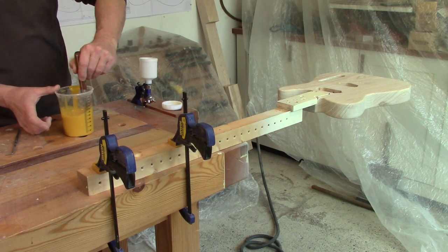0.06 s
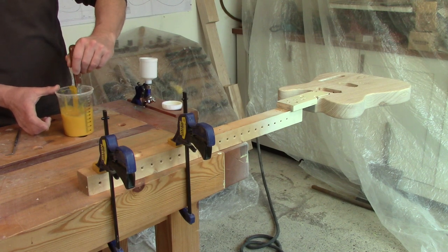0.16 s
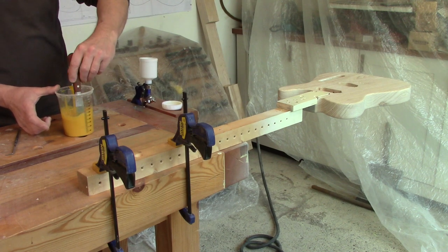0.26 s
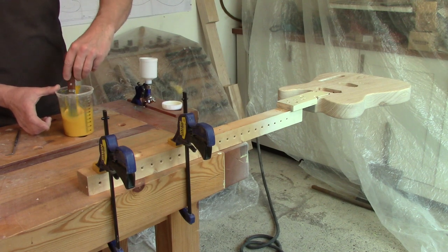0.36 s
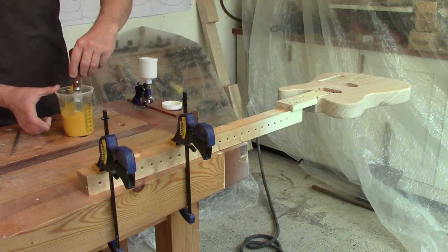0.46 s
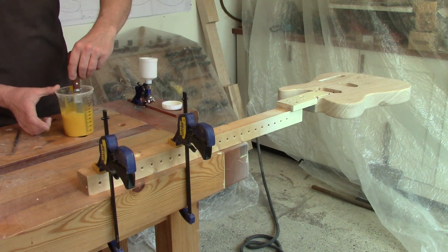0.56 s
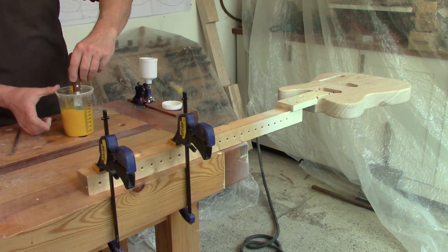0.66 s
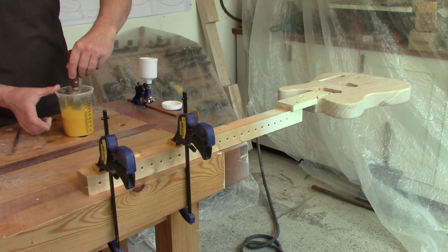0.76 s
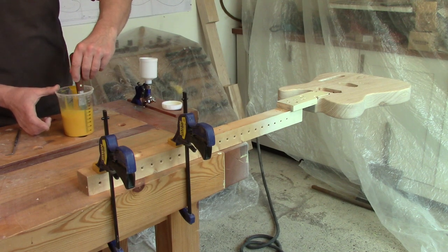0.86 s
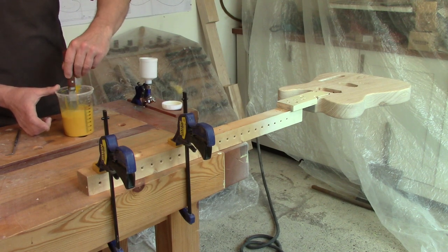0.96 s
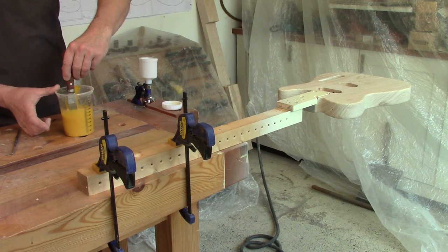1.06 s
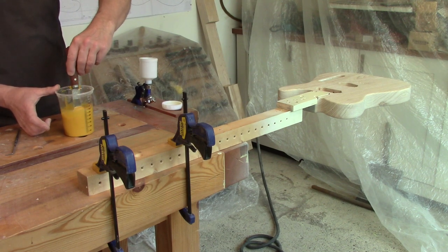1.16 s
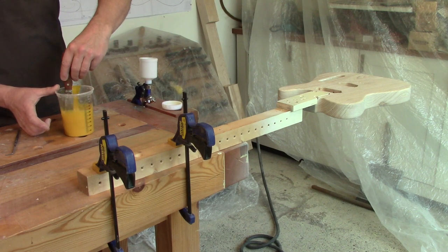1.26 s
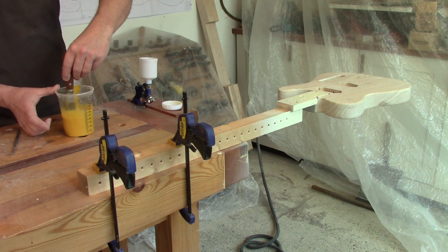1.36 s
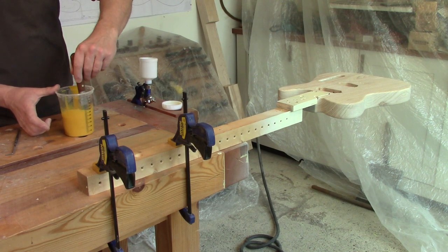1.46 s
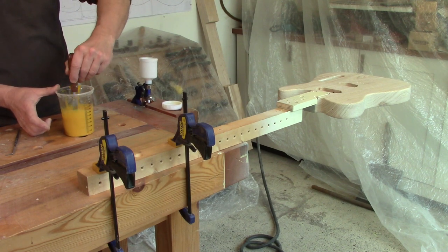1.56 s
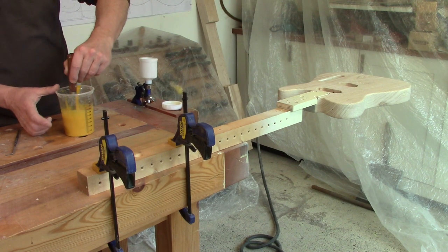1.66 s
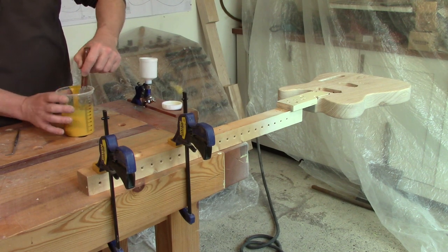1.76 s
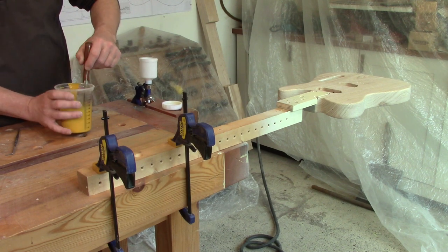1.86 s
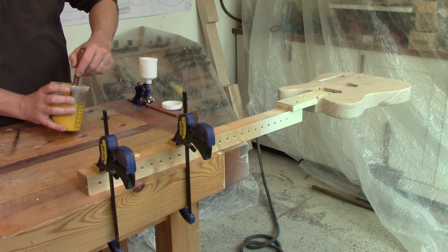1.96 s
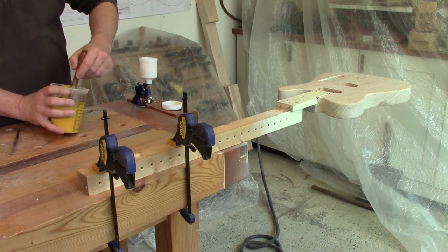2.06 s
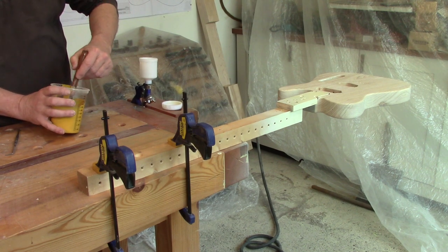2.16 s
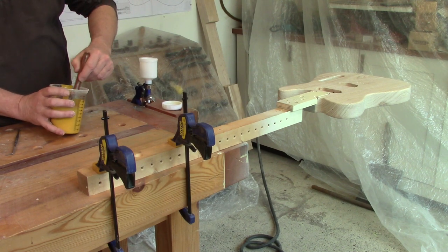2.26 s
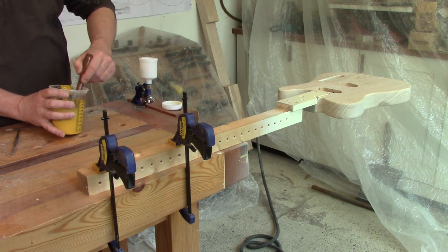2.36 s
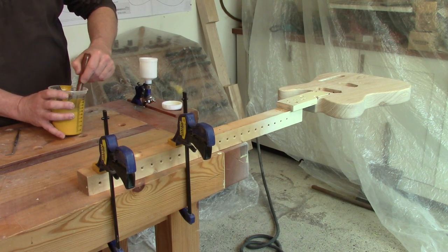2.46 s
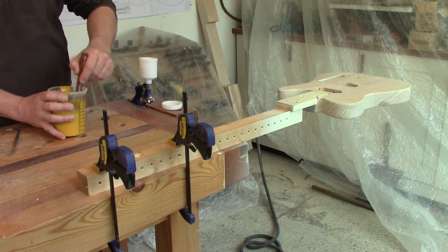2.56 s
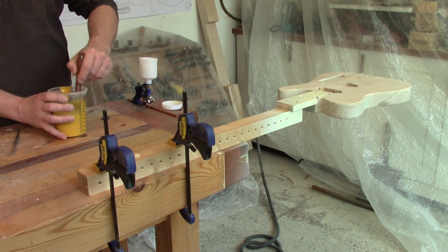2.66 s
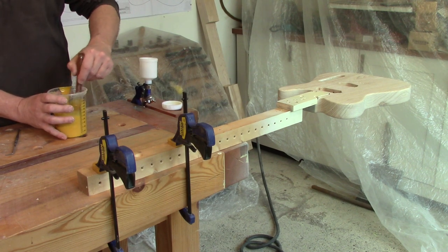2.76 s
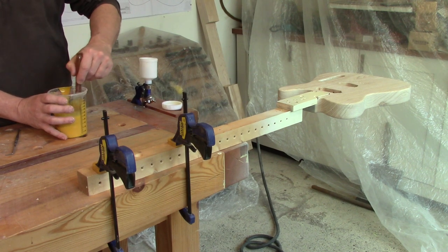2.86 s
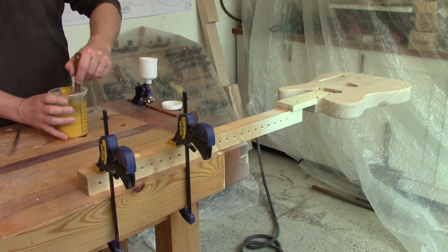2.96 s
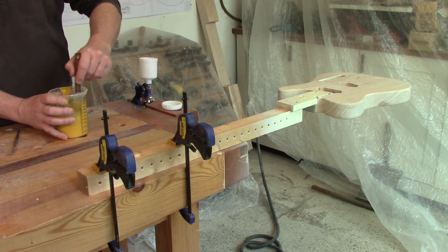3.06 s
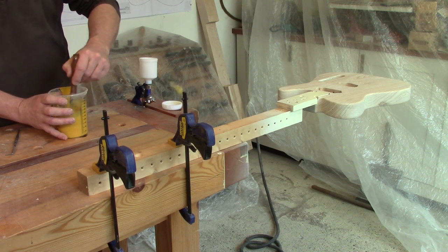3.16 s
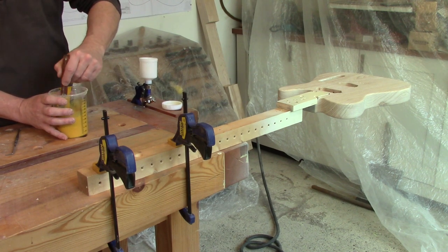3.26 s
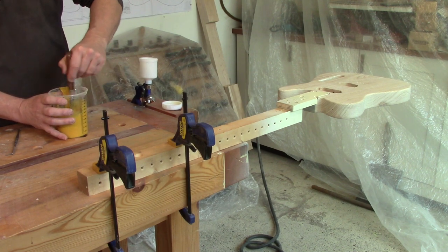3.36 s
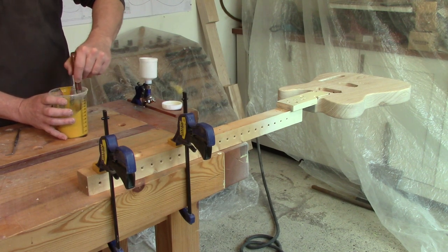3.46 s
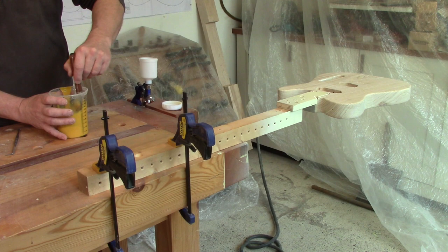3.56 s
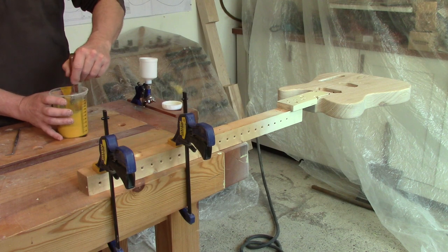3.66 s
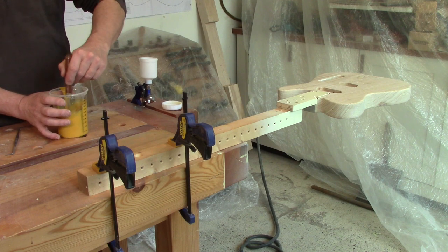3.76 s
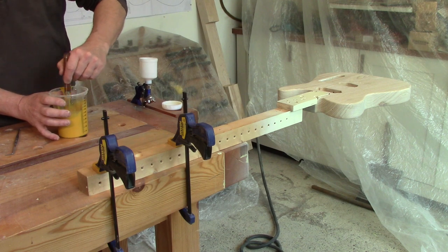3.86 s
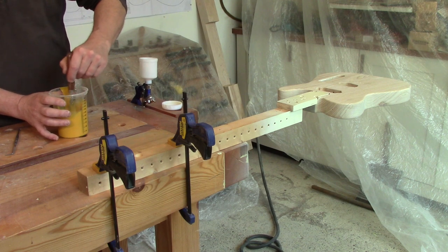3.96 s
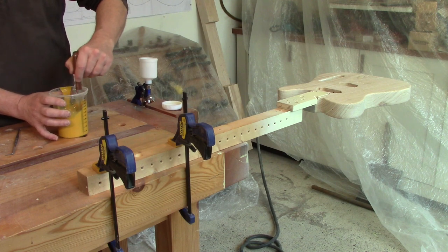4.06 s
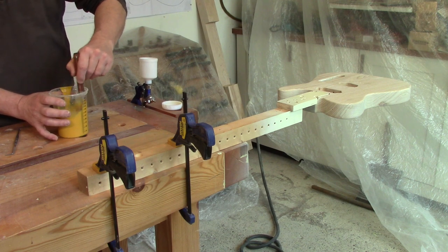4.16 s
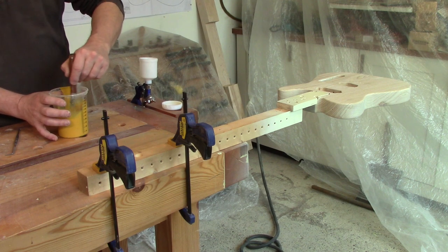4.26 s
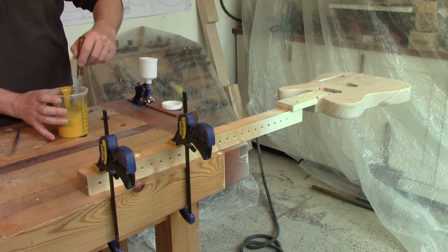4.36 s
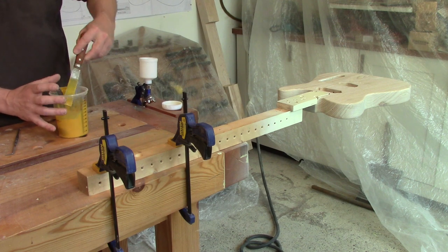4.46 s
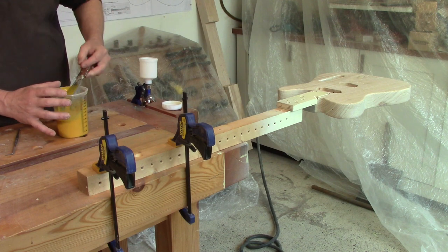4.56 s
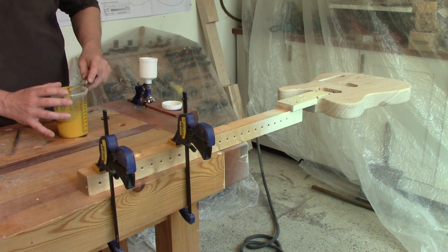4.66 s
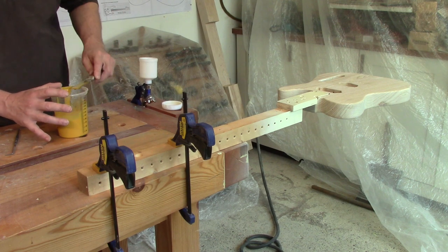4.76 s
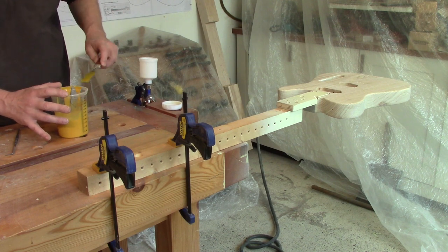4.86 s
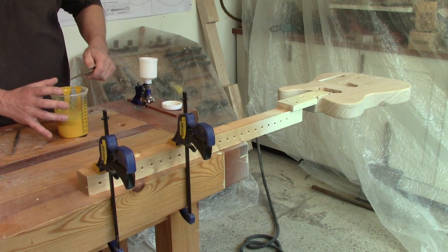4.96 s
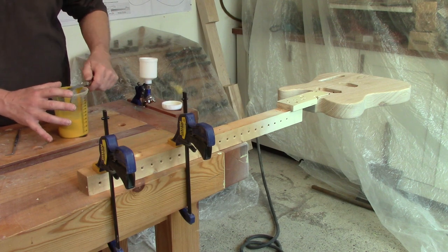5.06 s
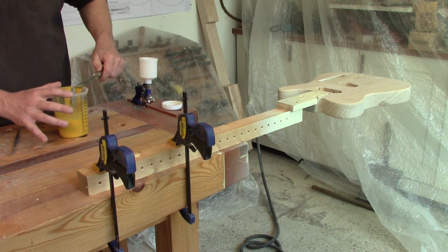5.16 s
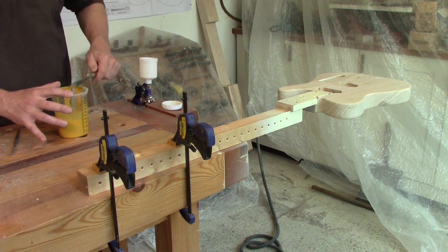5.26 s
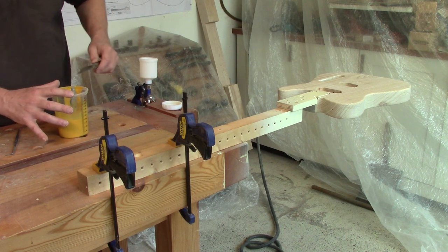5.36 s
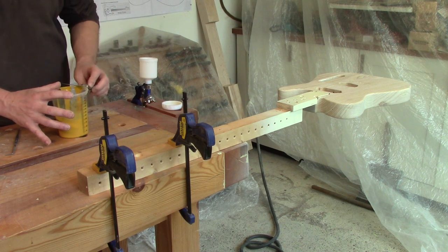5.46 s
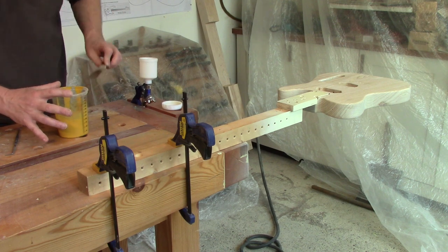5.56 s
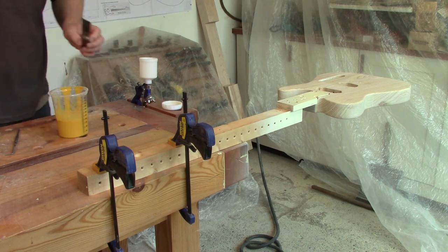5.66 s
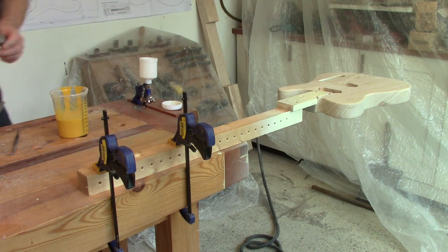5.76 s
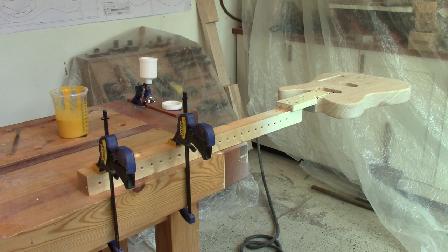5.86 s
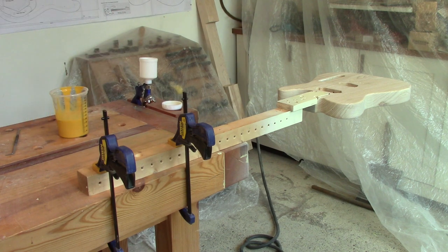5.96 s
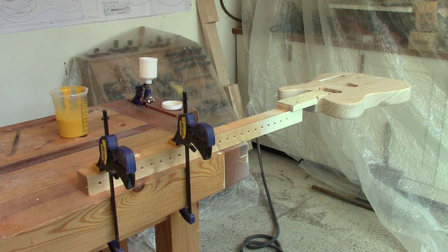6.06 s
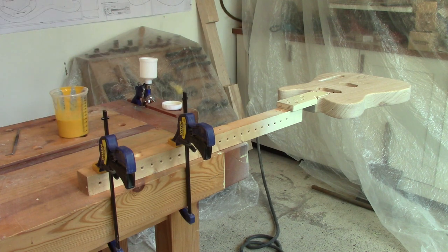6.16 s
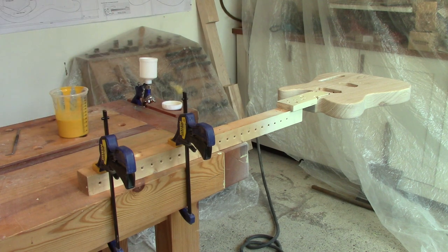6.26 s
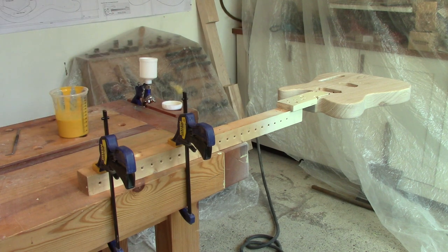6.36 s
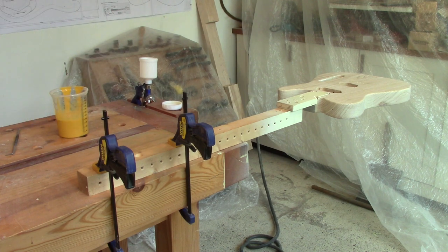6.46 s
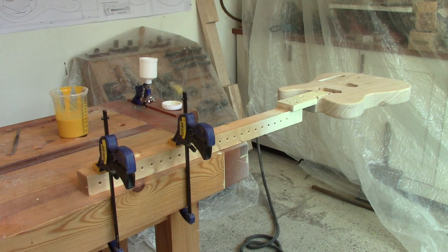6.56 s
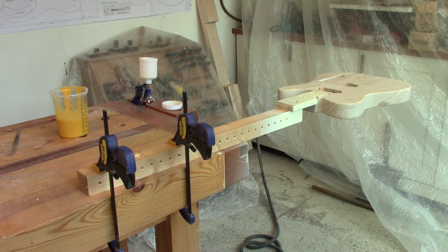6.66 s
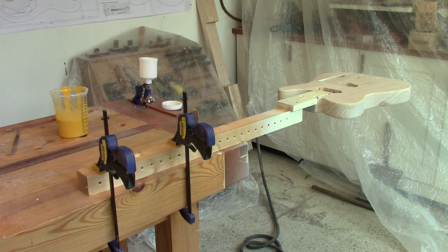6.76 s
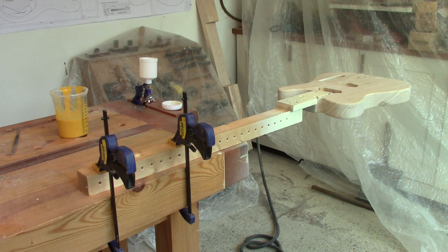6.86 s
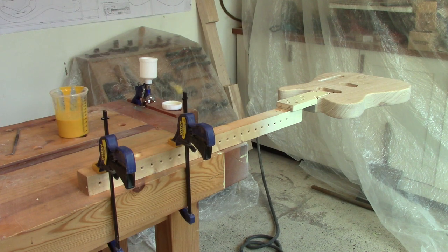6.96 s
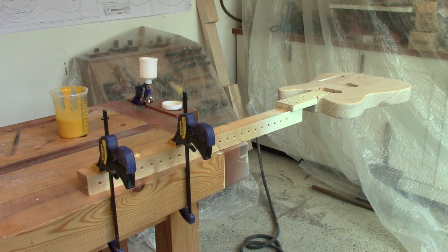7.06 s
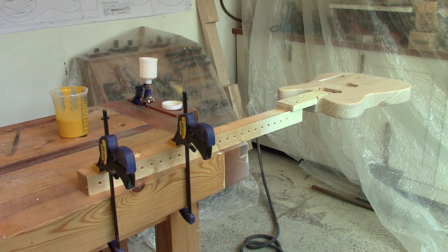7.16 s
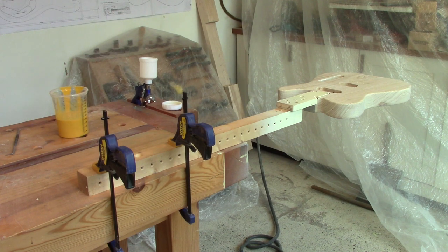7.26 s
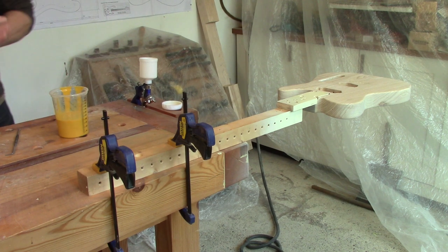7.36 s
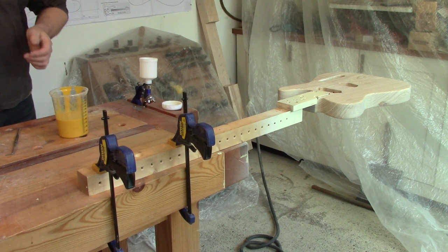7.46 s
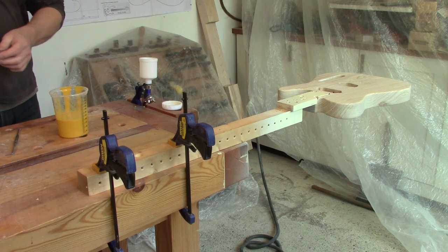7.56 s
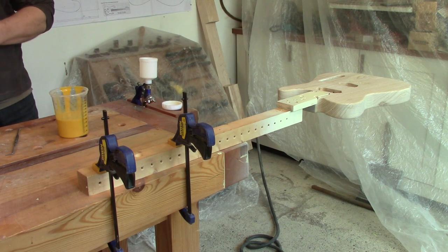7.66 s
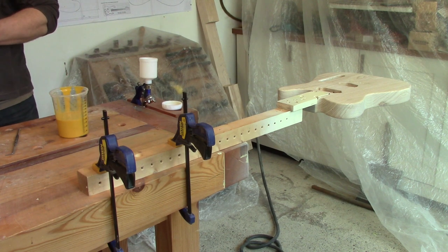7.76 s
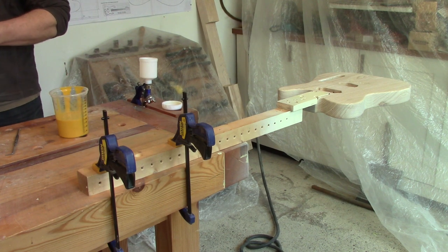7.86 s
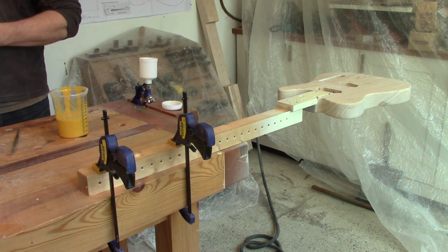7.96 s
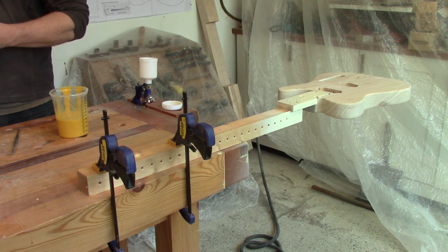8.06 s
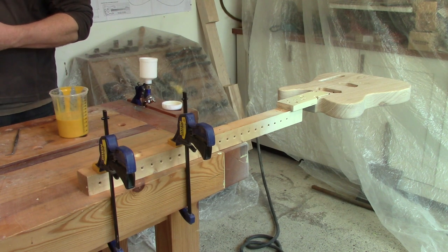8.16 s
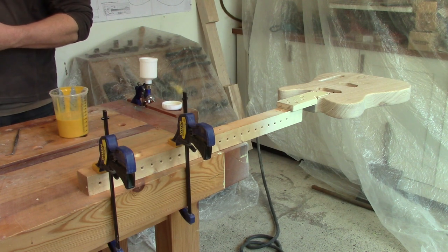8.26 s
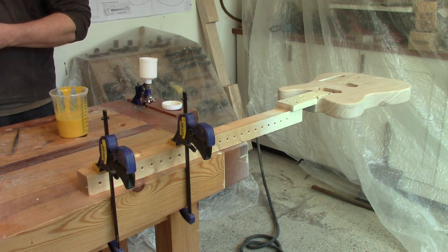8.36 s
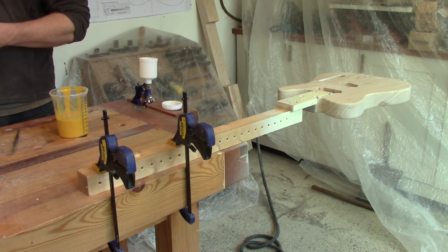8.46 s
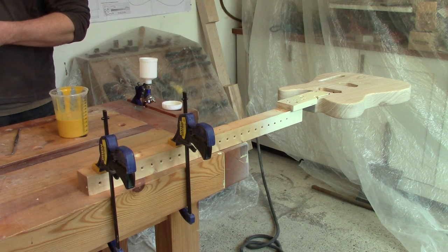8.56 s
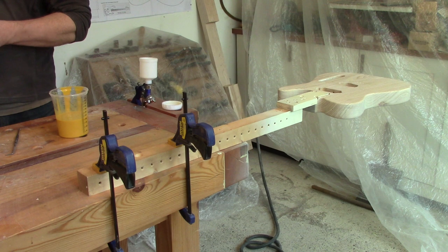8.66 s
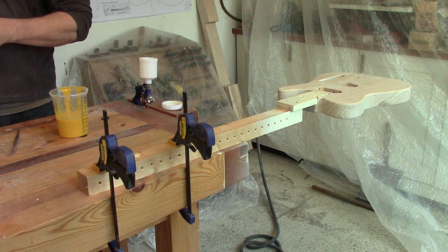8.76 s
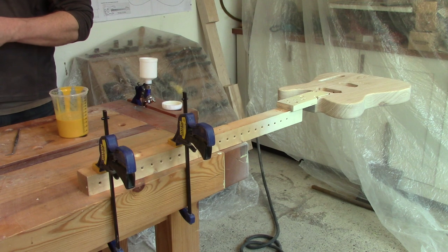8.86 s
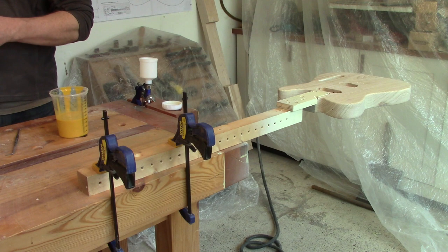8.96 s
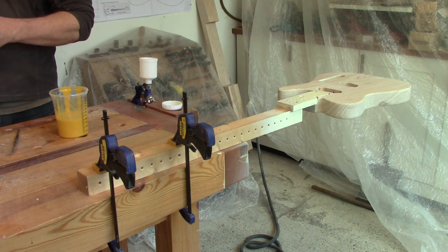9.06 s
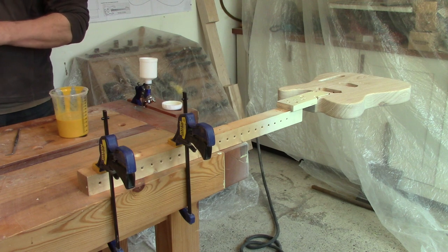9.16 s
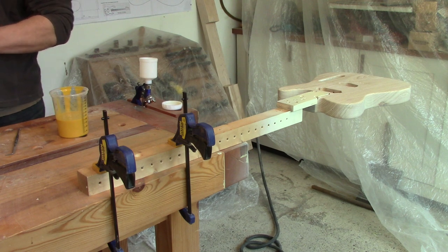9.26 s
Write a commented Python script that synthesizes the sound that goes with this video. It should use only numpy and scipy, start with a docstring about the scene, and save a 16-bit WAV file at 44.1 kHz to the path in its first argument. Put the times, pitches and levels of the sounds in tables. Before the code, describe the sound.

Close up, a thin metal blade stirs paint in a plastic cup: irregular dull clacks and light scraping, then an even, fast run of knocks and denser scraping. After a brief gap the blade is wiped on the rim with bright rasps and taps. Someone shuffles away and returns, cloth swishing, small things ticking on a wooden bench. Small workshop, short room tail, thin bass, soft steady hiss.

```python
"""A thin steel blade stirs paint in a plastic cup: impacts and stick-slip friction excite the damped modes of
blade, cup wall and bottom, and at last the blade is wiped off on the rim.
Then someone shuffles away and back, rubbing cloth (shaped friction noise) and nudging things on a bench
(short modal knocks). A closely spaced microphone pair with little bass hears it in a small workshop,
with a short diffuse room tail and a soft steady hiss."""
import sys
import numpy as np
from scipy import signal
from scipy.fft import rfft, irfft, next_fast_len
from scipy.io import wavfile
from scipy.ndimage import uniform_filter1d, map_coordinates

SR = 44100
rng = np.random.default_rng(int(sys.argv[2]) if len(sys.argv) > 2 else 0)


def boost_factor(decibels):
    """Convert a level in decibels to a linear amplitude factor."""
    exponent = np.asarray(decibels, float) / 20
    return 10 ** exponent


def wrap_up_sound(samples):
    """Save the sound to the file named by the first command line argument, as 16-bit audio."""
    columns = np.atleast_2d(samples).T
    # keep every value between -1 and 1, then stretch to whole-number steps
    tamed = np.clip(columns, -1, 1)
    steps = np.round(tamed * 32767).astype(np.int16)
    wavfile.write(sys.argv[1], SR, steps)


N = 410571  # samples

# In the mode tables T60 is that of the free mode; contact damping divides it.
# Blows of the blade on the cup: t/s, wall level/dB, heard pitch f/Hz, blade over wall level/dB,
# crack over wall level/dB
TAPS = [(0.035, -42.5, 2500, 1, 3), (0.101, -30.5, 2370, 5, -22), (0.134, -13, 1730, -7.5, -31),
        (0.245, -36.5, 1110, 0, 7), (0.281, -23.5, 1160, 0, -2), (0.33, -39.5, 1300, 5, 8),
        (0.384, -48.5, 2500, 0, 12), (0.43, -46.5, 4000, 7, 12), (0.457, -46, 3350, 20, -12),
        (0.523, -46, 2700, 11.5, 15), (0.558, -29.5, 1020, -15, -14), (0.687, -39, 1140, -5, 7.5),
        (0.714, -35, 1790, 2, -20), (0.733, -36, 1790, 2.5, 9), (0.776, -32, 1950, 4, -13),
        (0.861, -45.5, 2940, 5, 8.5), (0.886, -39, 1790, 4, -20), (0.938, -32.5, 1360, -2.5, -2),
        (1.038, -43, 1260, 6, 5.5), (1.118, -21.5, 1730, -4, -25), (1.172, -38, 3030, 10, -20),
        (1.225, -44.5, 1340, 9, 8), (1.258, -34.5, 3020, 1.5, 3.5), (1.308, -26, 1280, -5, -8),
        (1.356, -29, 1090, 4, -16), (1.414, -40.5, 1560, 3.5, 1), (1.504, -24, 1090, 2, 1.5),
        (1.648, -21, 1700, -3.5, 0), (1.7, -30, 1270, -14, -17), (1.95, -38, 2890, 3, 7),
        (1.968, -29, 1230, 0, 2), (2.08, -27, 3030, 2, -2), (2.171, -23, 1370, -5.5, -1.5),
        (2.261, -22, 1360, -3, -7), (2.348, -21.5, 1260, -3, 2.5), (2.441, -24, 1340, -11.5, 1.5),
        (2.539, -18, 1380, -8.5, 1), (2.635, -15.5, 1240, -5.5, -1.5), (2.735, -15.5, 1210, -6, -2.5),
        (2.834, -17, 1170, -4.5, -5.5), (2.934, -15, 1110, -4, -6), (3.047, -31.5, 1250, -22, 8.5),
        (3.148, -27.5, 1340, -3.5, -9), (3.181, -27, 970, -7, -19), (3.197, -31, 3050, -0.5, -8),
        (3.257, -21, 1250, -6, -4), (3.295, -15.5, 1010, -6.5, -15), (3.374, -29.5, 1310, -10, -15),
        (3.385, -32.5, 2900, 2.5, -10), (3.436, -23, 1300, -11, -25), (3.46, -30.5, 2900, 0.5, -8),
        (3.5, -20, 1490, -0.5, -28), (3.507, -24.5, 2600, 0, -19), (3.549, -17.5, 1330, -2, -24),
        (3.61, -26, 3140, 4.5, -1), (3.729, -24, 1320, 0.5, -1), (3.845, -34, 2500, 1, -10),
        (3.868, -34, 1350, 6.5, -16), (3.902, -21, 1370, -19, -25), (3.94, -30, 1300, -5, -8),
        (3.967, -31.5, 1360, 7, -12), (3.983, -33, 1300, 8.5, -10), (4.047, -27.5, 1250, -3, -13),
        (4.087, -33, 3020, 7, -10), (4.115, -37, 2500, 4.5, -8), (4.166, -26, 930, -3.5, -14),
        (4.211, -26.5, 1280, -2, -19), (4.235, -30.5, 1300, -0.5, -12), (4.263, -14, 1380, -9.5, -25),
        (4.337, -16, 1400, -8.5, -30), (4.597, -26, 900, 3, -6), (4.739, -46, 1340, 10, -16),
        (4.876, -34.5, 1370, -2, 9), (5.07, -26, 1820, 8, 4.5), (5.223, -36.5, 2370, 3, 10),
        (5.316, -19, 1000, 2, 9.5), (5.345, -27.5, 1860, -3, 12), (5.496, -24, 1120, 4, 3),
        (5.584, -33, 2000, 7, 24)]
# Modes of the paint-damped cup wall: f/Hz, level/dB, T60/s
WALL = [(706, 2.5, 0.082), (857.4, 2.5, 0.051), (926, 5, 0.063), (1000, 3.5, 0.049), (1099, 6, 0.054),
        (1250, 7, 0.05), (1320, 7.5, 0.051), (1458, 4, 0.066), (1600, 4.5, 0.048), (1733, 4.5, 0.049),
        (1900, 3.5, 0.039)]
# Modes of the steel blade: f/Hz, level/dB, T60/s
BLADE = [(2194, 1, 0.056), (2358, 7, 0.08), (2520, 4.5, 0.039), (2793, 1, 0.071), (2900, 0.5, 0.048),
         (3030, 1.5, 0.033), (3375, -2, 0.04), (3770, -7, 0.0093), (4330, -7, 0.064), (7500, -7, 0.13)]
# Modes of the cup bottom on the bench: f/Hz, level/dB, T60/s
BOTTOM = [(480.6, -1, 0.07), (600, -4, 0.025)]
# Spans with the cup off the bench: from t/s, to t/s
LIFTED = [(1.96, 3.1), (4.5, 5.6)]
# Short bright skids of the blade's edge: t/s, peak level/dB, centre f/Hz
SKIDS = [(1.257, -34, 5600), (1.3467, -25, 9600), (1.441, -34.5, 6600), (1.625, -36, 4060),
         (1.825, -35, 9200), (1.9953, -20.5, 10300), (2.937, -25, 7900), (2.944, -22.5, 4760),
         (3.149, -24.5, 8900), (3.198, -29, 6850), (3.3984, -25, 7600), (3.549, -22, 4220),
         (3.6454, -26.5, 6740), (3.762, -26.5, 7800), (3.886, -28, 6600), (3.9823, -24.5, 8900),
         (4.003, -31.5, 4800), (4.019, -26.5, 11000), (4.1198, -27.5, 6840), (5.219, -33, 7150)]
# Pressure of the blade on the wall, heard as mean drag: t/s, drag level/dB
PRESSURE = [(0, -56), (.6, -64), (.67, -81), (1.0, -73), (1.1, -61), (1.6, -58), (1.8, -77), (2.1, -68),
            (2.5, -65), (3.1, -56), (3.45, -53), (3.8, -54), (4.0, -51), (4.33, -52), (4.42, -87)]
# Strokes round the wall between the blows: peak t/s, fall to -20 dB t/s, drag level/dB, grit level/dB
STROKES = [(.045, 0, -48.5, -44), (.33, 0, -54, -49), (.385, 0.06, -55, -54), (.48, 0.1, -65, -52),
           (.6, 0.1, -71, -54), (.75, 0.17, -53, -50), (1.07, 0.1, -50, -54), (1.14, 0.1, -48, -53.5),
           (1.33, 0.12, -48, -48), (1.445, 0.3, -63, -53), (1.61, 0.06, -59, -54), (1.7, 0.08, -49, -50),
           (1.835, 0.14, -64, -51.5), (2.12, 0.2, -53, -62), (2.22, 0.05, -54, -48), (2.31, 0.3, -61, -50),
           (2.425, 0.3, -65, -50.5), (2.5, 0.08, -65, -50), (2.6, 0, -60, -48), (2.695, 0.14, -54, -47),
           (2.795, 0.17, -46, -48), (2.894, 0.13, -48, -46), (3.0, .06, -52.5, -45), (3.09, 0.25, -59, -49),
           (3.329, 0.12, -44.5, -41), (3.465, 0.13, -45.5, -52), (3.525, 0.2, -48, -51),
           (3.58, 0.2, -45, -49), (3.827, 0.03, -45.5, -48), (3.945, 0.06, -46, -47),
           (4.06, 0.04, -51, -45), (4.24, 0.01, -46, -41.5), (4.31, 0.01, -53, -53)]
# Spectral density of stirring grit: f/Hz, relative level/dB
GRIT = [(1000, -27), (3000, -1), (5000, -6), (8000, 1.5), (12000, -1.5), (15500, -3)]
# Wipes on the rim: peak t/s, rise from -20 dB t/s, fall to -20 dB t/s, drag level/dB, grit level/dB
WIPES = [(4.635, 0.05, 0.02, -44.5, -50), (4.81, 0.09, 0.0657, -31.5, -36),
         (4.87, 0.04, 0.05, -45.5, -42.5), (5.08, -0.01, 0.09, -34, -52), (5.13, 0.04, 0.07, -41.5, -45),
         (5.19, 0.04, 0.05, -36, -35), (5.225, 0.03, 0.04, -40, -45), (5.325, -0.0042, 0.027, -34.5, -33),
         (5.35, 0.02, 0.04, -37.5, -35.5), (5.505, -0.03, 0.0951, -31.5, -37),
         (5.53, 0.01, 0.08, -42, -38.5), (5.59, 0.0433, 0.0627, -38, -34)]
# Spectral density of rim grit: f/Hz, relative level/dB
RASP = [(1500, -20), (3000, -8), (4300, 0), (6000, -7.5), (7500, 3), (10000, -9.5), (15500, -8.5)]
# Steps and things nudged on the bench: t/s, level/dB, pitch f/Hz, tick level/dB relative to the knock
KNOCKS = [(5.779, -28.5, 1700, -14), (5.958, -32, 1600, -3), (6.019, -33, 1610, -12), (6.593, -35, 1130, 4),
          (6.881, -33, 2420, 0), (7.09, -30, 950, -30), (7.166, -41.5, 1790, -6), (7.345, -27.5, 1300, -10),
          (7.39, -30.5, 1300, -20), (7.54, -35, 4800, 0), (7.555, -36, 1300, -20),
          (7.741, -37.5, 1340, -3.5), (7.921, -27.5, 1550, -10), (7.925, -32.5, 4900, -7),
          (8.098, -30, 4560, 3), (8.101, -33.5, 1090, -20), (8.332, -31, 1750, -2), (8.5, -36, 3600, -3),
          (8.651, -35.5, 1900, -4), (8.695, -37.5, 4400, 2), (8.895, -43, 1800, 1),
          (9.005, -29.5, 2610, -7.5), (9.066, -41.5, 4970, 9), (9.108, -32.5, 4300, -3),
          (9.214, -25.5, 4230, -8), (9.219, -30, 2380, -20), (9.245, -28, 6340, -6)]
# Modes of the wooden bench: f/Hz, level/dB, T60/s
BENCH = [(775, 2, 0.011), (1220, 1.5, 0.013), (1750, -3, 0.009), (2600, -5.5, 0.0037), (4800, -6, 0.0068)]
# How busily the person moves: t/s, mean swish level/dB
MOVING = [(5.76, -79), (5.86, -52), (6.1, -50), (6.3, -58.5), (7.0, -66), (7.5, -68), (7.56, -58),
          (7.85, -57), (8.2, -62.5), (8.65, -64), (8.72, -55.5), (8.95, -62.5), (9.31, -57)]
# Swishes of soles and cloth: peak t/s, rise from -20 dB t/s, fall to -20 dB t/s, swish level/dB, body level/dB
SWISHES = [(5.865, 0.05, 0.12, -43.5, -43.5), (5.98, 0, 0.16, -43.5, -44.5), (6.02, 0, 0.12, -53, -48.5),
           (6.23, .09, 0.06, -44, -48.5), (6.35, 0.07, 0.06, -42, -62), (6.435, 0.02, 0.06, -43.5, -57),
           (6.61, 0.08, 0.1, -50, -52), (6.705, 0.07, .065, -42, -48.5), (6.8, 0.06, 0.03, -48, -55.5),
           (6.885, 0.2, 0.08, -54, -52), (7.28, -0.1, .05, -56, -70), (7.41, 0.055, .05, -40, -65),
           (7.545, .01, 0.12, -47.5, -45.5), (7.7, 0, 0.17, -45.5, -54), (7.755, 0, 0.13, -49, -49.5),
           (7.898, 0.04, 0.07, -44.5, -48), (7.928, 0.03, 0.07, -46, -47), (8.102, .003, .04, -47, -46),
           (8.335, .004, -0.04, -47.5, -45), (8.41, 0.2, 0.14, -54.5, -53.5),
           (8.505, 0.04, 0.06, -48, -55.5), (8.56, .015, 0.14, -53, -62), (8.7, .02, 0.2, -50, -60),
           (8.895, 0.16, 0.1, -57, -55.5), (9.01, .006, 0.4, -53.5, -54), (9.07, -0.05, 0.1, -43.5, -58),
           (9.12, -0.02, 1.5, -48.5, -49.5), (9.24, .06, 0, -31, -37)]
# Spectral density of the bright swish: f/Hz, relative level/dB
SWISH = [(2500, -20), (4500, -11), (6500, -8), (9000, -5.5), (15700, -9)]
# Spectral density of the dull rubbing: f/Hz, relative level/dB
BODY = [(200, -45), (450, -15), (900, -10), (1200, -5), (1900, -10), (5200, -6), (7000, -16), (11000, -45)]
# A faint falling squeak: t/s, mean pitch f/Hz, level/dB
SQUEAK = [(7.56, 4800, -66), (7.6, 4600, -55), (7.69, 4200, -60)]
# Decay of the room: f/Hz, T60/s
ROOM = [(300, 0.29), (1000, 0.16), (3000, 0.12), (10000, 0.068)]
# Left-right correlation of the room tail: f/Hz, correlation [-]
ECHO_ALIKE = [(300, 1), (1000, 1), (2200, 0.955), (5000, 0.96), (12000, 0.81)]
# Spectral density of the hiss: f/Hz, relative level/dB
HISS = [(40, -21.5), (110, -19), (170, -12), (250, -12.5), (400, -7), (700, -3), (1200, -3), (2500, -8.5),
        (5400, -12.5), (6600, -16), (13500, -19), (15300, -13.5)]
# Left-right correlation of the hiss: f/Hz, correlation [-]
ALIKE = [(60, 0), (180, 0.85), (600, 0.73), (5000, 0.73), (15000, 0.82)]

# A high pitch is the blade's, a low one the wall's; the other body keeps to its usual pitch.
BLADE_FROM_HZ, WALL_HZ, BLADE_HZ = 2100, 1300, 2550
BLADE_SCATTER = 0.04  # natural log of frequency, rms
RIM_FROM_S, RIM_BLADE_HZ = 4.5, 2370  # on the rim the same part of the blade lands each time
# A blow low on the wall (low pitch) shakes the bottom more; level stated at 1 kHz.
THUD_DB, THUD_DB_PER_OCTAVE = -11.5, 17.5
LIFTED_DB = -30  # change of the thud while the cup is lifted
RATTLE_S, RATTLE_GROWS = 0.04, 0.17  # length for a -20.5 dB blow; dB of length per dB of blow
RATTLE_HOLDS = 1.3  # exponent: 1 dies evenly, more holds on and then drops
TRAIL_DB, TRAIL_FALL_S, TRAIL_GRIT_DB = -28.5, 0.062, -12  # drag re blow, fall to -20 dB, grit re drag
PRESSURE_GRIT_DB = -2  # grit re drag
STROKE_RISE_S = 0.01  # from -20 dB
BLADE_ROUND, SWISH_ROUND = 1.4, 1.7  # swell exponents: 1 pointed, 2 bell-shaped
THING_DB, THING_T60_S = 0.5, 0.013  # the nudged thing's own free mode
BACK_S = 7.5
AWAY_BODY_DB, BACK_BODY_DB = -4.5, 1  # dull rubbing re steady swish: walking off, and busy at the bench
HISS_DB = -54.5
HUM_HZ, HUM_WIDTH_HZ = 195, 16
HUM_DB, HUM_WAVERS_DB = -29.5, 4  # mean re hiss, and scale of its wavering
BASS_CUT_HZ, TOP_HZ = 360, 15800


def taps():
    """Impact excitation: each blow rings wall, blade and bottom, and snaps and skids on for a moment."""
    out, t = np.zeros(N + SR), np.arange(SR // 8) / SR
    for (s, db, hz, blade_db, crack_db), luck in zip(TAPS, rng.standard_normal(len(TAPS))):
        usual_blade_hz = BLADE_HZ * np.exp(BLADE_SCATTER * luck) if s < RIM_FROM_S else RIM_BLADE_HZ
        wall_hz, blade_hz = (WALL_HZ, hz) if hz > BLADE_FROM_HZ else (hz, usual_blade_hz)
        lifted = any(up < s < down for up, down in LIFTED)
        thud_db = min(THUD_DB - THUD_DB_PER_OCTAVE * np.log2(wall_hz / 1000), -3)
        thud_db += LIFTED_DB * lifted
        rattle = RATTLE_S * boost_factor(RATTLE_GROWS * (db + 20.5))  # harder blows rattle longer
        wall = ring(favour(WALL, wall_hz, 4.3), t, rattle)
        blade = ring(favour(BLADE, blade_hz, 12.5), t, 0.035)
        thud = ring(BOTTOM, t, 0.031)
        snap = crack(t, 0.0031, 6600) + boost_factor(-8.0) * crack(t, 0.089, 3500)
        blow = wall + boost_factor(blade_db) * blade + boost_factor(thud_db) * thud + boost_factor(crack_db) * snap
        out[round(s * SR):][:len(t)] += boost_factor(db) * blow
    return out[:N]


def favour(modes, hz, db_per_octave):
    """Modal participation: the place struck favours the modes near its pitch."""
    return [(c, db - db_per_octave * abs(np.log2(c / hz)), t60) for c, db, t60 in modes]


def ring(modes, t, rattle):
    """Modal synthesis: a sharp blow and the rattle after it drive scattered modes; peak 1."""
    luck = rng.standard_normal((len(modes), 2))
    struck = [(hz * (1 + 0.008 * a), db + 2 * b, t60) for (hz, db, t60), (a, b) in zip(modes, luck)]
    # the rattle has fallen 60 dB at time rattle
    force = boost_factor(-60 * (t / rattle) ** RATTLE_HOLDS) * rng.standard_normal(len(t))
    force = force + boost_factor(21) * (t == 0)
    x = filtered(force, resonant(struck, 2.53))
    return x / np.abs(x).max()


def resonant(modes, damping):
    """Superposed damped resonators: a causal response whose bandwidths grow with contact damping."""
    def response(f):
        total = 0
        for k, (centre, db, t60) in enumerate(modes):
            width = damping * np.log(1000) / (np.pi * t60)
            mode = 1j * f * width / (centre * centre - f * f + 1j * f * width)
            total = total + (-1) ** k * boost_factor(db) * mode
        return total
    return response


def crack(t, t60, low_hz):
    """Broadband contact transient: decaying noise, high-passed and duller at the very top; peak 1."""
    band = lambda hz: (1j * hz / (low_hz + 1j * hz)) ** 2 / (1 + 1j * hz / 9000) ** 2
    x = filtered(boost_factor(-60 * t / t60) * rng.standard_normal(len(t)), band)
    return x / np.abs(x).max()


def filtered(x, response):
    """Linear filtering: the spectrum of x times a complex response of frequency."""
    m = next_fast_len(x.shape[-1] + 8192)
    return irfft(rfft(x, m) * response(np.fft.rfftfreq(m, 1 / SR)), m)[..., :x.shape[-1]]


def skids():
    """Noise-driven resonance: each skid is a burst of noise in one treble mode."""
    out, t = np.zeros(N + SR), np.arange(SR // 10) / SR
    for s, db, hz in SKIDS:
        out[round(s * SR):][:len(t)] += boost_factor(db) * ring([(hz, 0, 0.0025)], t, 0.052)
    return out[:N]


def stirring():
    """Friction grows with pressure: wavering steady drag, strokes, and a trail after each blow in paint."""
    steady = gains(PRESSURE)[0] * boost_factor(3.4 * wobble(18)) * boost_factor([[0], [PRESSURE_GRIT_DB]])
    strokes = [(s, STROKE_RISE_S, *rest) for s, *rest in STROKES]
    trails = []
    for s, db, *_ in TAPS:
        if s < RIM_FROM_S:
            trail_db = db + TRAIL_DB
            trails.append((s + 0.014, 0.01, TRAIL_FALL_S, trail_db, trail_db + TRAIL_GRIT_DB))
    effort = np.hypot(steady, swells(strokes + trails, BLADE_ROUND))
    return drag(effort, BLADE, GRIT, damping=5.7, wall_db=-1.5)


def wiping():
    """Friction on a fixed contact: the rim favours one blade pitch and damps the blade less than paint."""
    edge = favour(BLADE[:-1], RIM_BLADE_HZ, 16) + BLADE[-1:]
    return drag(swells(WIPES, BLADE_ROUND), edge, RASP, damping=1.9, wall_db=-6.0)


def drag(effort, edge, colour, damping, wall_db):
    """Stick-slip excitation: slips of the blade drive blade and wall modes; the finest ones hiss."""
    drag_gain, grit_gain = effort
    rub = lambda response, spiky_db: grains(response, spiky_db, patchy_db=3)
    blade = rub(resonant(edge, damping), 6)
    wall = rub(resonant(WALL + BOTTOM, 4), 6)
    grit = rub(lambda hz: boost_factor(along(colour, hz)), 4)
    return drag_gain * (blade + boost_factor(wall_db) * wall) + grit_gain * grit


def grains(spectrum, spiky_db, patchy_db):
    """Granular friction noise: tiny slips of scattered size, coloured, in random patches; rms 1."""
    slips = rng.standard_normal(N) * boost_factor(spiky_db * wobble(900))
    z = signal.stft(slips, nperseg=256)[2]
    field = uniform_filter1d(rng.standard_normal(z.shape), size=13, axis=0)  # over frequency
    field = uniform_filter1d(field, size=11, axis=1)  # over time
    patched = signal.istft(z * boost_factor(patchy_db * unit(field)), nperseg=256)[1][:N]
    return unit(filtered(patched, spectrum))


def swells(rows, roundness):
    """Incoherent addition: swells rise and fade about their peaks and their powers add; two gain curves."""
    power, t = np.zeros((2, N)), np.arange(N) / SR
    for s, rise, fall, *db in rows:
        # cut at twice rise and fall; a negative one moves that cut past the peak
        near = slice(max(round((s - 2 * rise) * SR), 0), round((s + 2 * fall) * SR))
        away = np.where(t[near] < s, (s - t[near]) / rise, (t[near] - s) / fall)
        power[:, near] += boost_factor(np.c_[db] - 20 * away ** roundness) ** 2
    return np.sqrt(power)


def gains(rows):
    """Logarithmic level interpolation: one gain curve for each dB column, silent outside the table."""
    s, *cols = np.transpose(rows)
    return [boost_factor(np.interp(np.arange(N) / SR, s, c, left=-200, right=-200)) for c in cols]


def wobble(rate):
    """Band-limited fluctuation: a smooth random curve, rate knots a second."""
    return map_coordinates(rng.standard_normal(int(N * rate / SR) + 4), [np.arange(N) * rate / SR])


def unit(x):
    """Power normalisation: scaled to rms 1."""
    return x / np.sqrt(np.mean(x ** 2) + 1e-20)


def along(points, hz):
    """Logarithmic frequency scale: (f, value) points interpolated on it."""
    f, v = np.transpose(points)
    return np.interp(np.log(hz + 1), np.log(f + 1), v)


def knocks():
    """Soft impact: bench modes and the thing's own, muffled above the pitch struck, with a bright tick."""
    out, t = np.zeros(N + SR), np.arange(SR // 10) / SR
    for s, db, hz, tick_db in KNOCKS:
        modes = sorted(favour(BENCH, hz, 7) + [(hz, THING_DB, THING_T60_S)])
        soft = filtered(ring(modes, t, 0.074), lambda f: 1 / (1 + 1j * f / (2.5 * hz)))
        tick = crack(t, 0.005, 2500) + boost_factor(-5) * crack(t, 0.07, 4500)
        out[round(s * SR):][:len(t)] += boost_factor(db) * (soft + boost_factor(tick_db) * tick)
    return out[:N]


def shuffle():
    """Shaped friction noise: soles and cloth swish brightly over a duller rubbing."""
    body_db = np.where(np.arange(N) < BACK_S * SR, AWAY_BODY_DB, BACK_BODY_DB)
    steady = gains(MOVING)[0] * boost_factor(1.2 * wobble(15)) * boost_factor([np.zeros(N), body_db])
    swish_gain, body_gain = np.hypot(steady, swells(SWISHES, SWISH_ROUND))
    rub = lambda spectrum: grains(lambda hz: boost_factor(along(spectrum, hz)), spiky_db=3, patchy_db=2.6)
    return swish_gain * rub(SWISH) + body_gain * rub(BODY)


def squeak():
    """Frequency modulation: a thin, slightly unsteady sine tone."""
    s, hz, db = np.transpose(SQUEAK)
    pitch = np.interp(np.arange(N) / SR, s, hz) * (1 + 0.01 * wobble(150))
    return gains(np.c_[s, db])[0] * np.sin(2 * np.pi * np.cumsum(pitch) / SR)


def room(x):
    """Diffuse reverberation: a noise tail drawn anew every quarter second, with its own decay per frequency."""
    out, step = np.zeros((2, N + SR)), SR // 4
    for start in range(0, N, step):
        hz, t, z = signal.stft(rng.standard_normal((2, SR // 3)), SR, nperseg=256)
        decay = boost_factor(-60 * t / along(ROOM, hz)[:, None])
        tail = signal.istft(z * decay, SR, nperseg=256)[1]
        tail = spread(tail / np.linalg.norm(tail[0]), ECHO_ALIKE)
        wet = signal.fftconvolve(x[None, start:start + step], tail, axes=1)
        out[:, start + SR // 300:][:, :wet.shape[1]] += wet  # about 3 ms late
    return out[:, :N]


def spread(pair, alike):
    """Interchannel correlation: two unrelated noises mixed to a given left-right likeness."""
    turn = lambda hz: np.arccos(np.clip(along(alike, hz), -1, 1)) / 2
    mid, side = filtered(pair, lambda hz: np.array([np.cos(turn(hz)), np.sin(turn(hz))]))
    return np.array([mid + side, mid - side])


def hiss():
    """Stationary noise of room and microphones, with a narrow-band low hum that wavers in level."""
    hum_band = lambda hz: np.exp(-((hz - HUM_HZ) / HUM_WIDTH_HZ) ** 2)
    hum = unit(filtered(rng.standard_normal(N), hum_band))
    pair = spread(rng.standard_normal((2, N)), ALIKE)
    noise = unit(filtered(pair, lambda hz: boost_factor(along(HISS, hz))))
    return boost_factor(HISS_DB) * (noise + boost_factor(HUM_DB + HUM_WAVERS_DB * wobble(2.5)) * hum)


def scene():
    """Superposition of direct and diffuse sound: cup and shuffling, both nearly centred, with room tails."""
    cup = taps() + skids() + stirring() + wiping()
    far = knocks() + shuffle() + squeak()
    direct = cup * boost_factor([[0.15], [-0.15]]) + far * boost_factor([[0.25], [-0.25]])  # left, right
    return direct + room(boost_factor(-7) * cup + boost_factor(-7.5) * far)


def roll_off(x):
    """The treble ends steeply here."""
    return signal.sosfilt(signal.butter(12, 17020, fs=SR, output="sos"), x)


def record(dry):
    """Band limiting: a steep bass cut on the scene, then steady hiss, and little left above the top limit."""
    thin = filtered(dry, lambda hz: (1j * hz / (BASS_CUT_HZ + 1j * hz)) ** 3)
    limited = filtered(thin + hiss(), lambda hz: np.where(hz < TOP_HZ, 1, boost_factor(-36)))
    return roll_off(limited)


dry = scene()
out = record(dry)
wrap_up_sound(out)
```